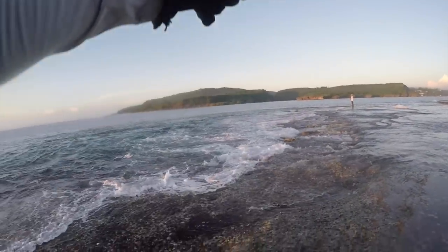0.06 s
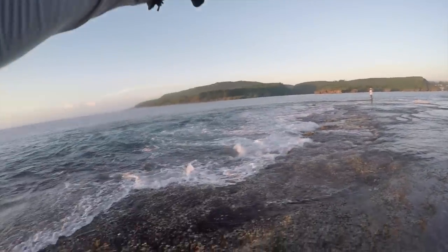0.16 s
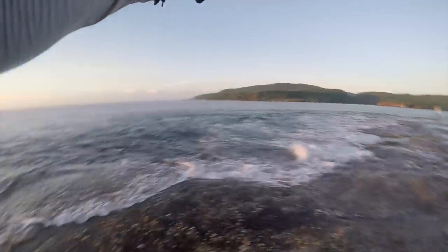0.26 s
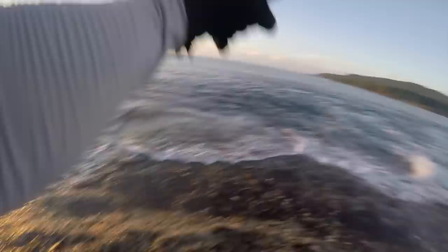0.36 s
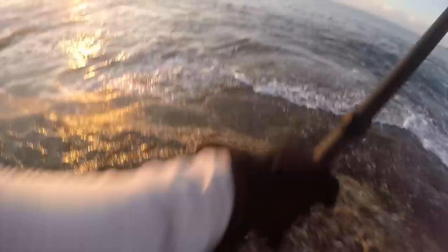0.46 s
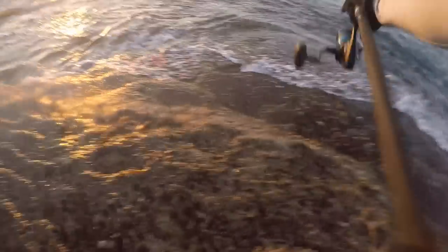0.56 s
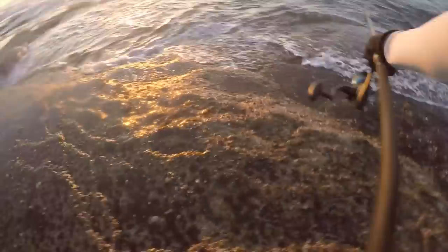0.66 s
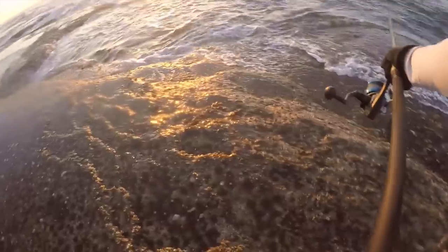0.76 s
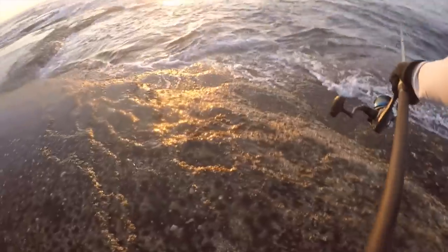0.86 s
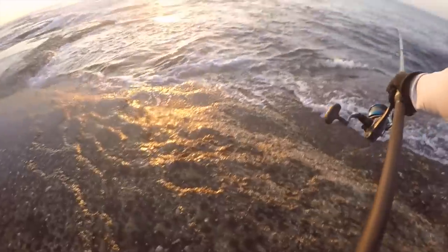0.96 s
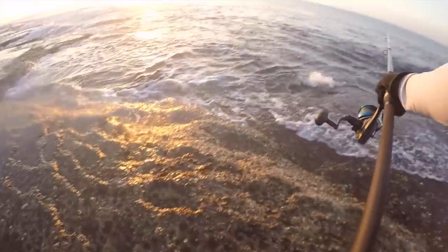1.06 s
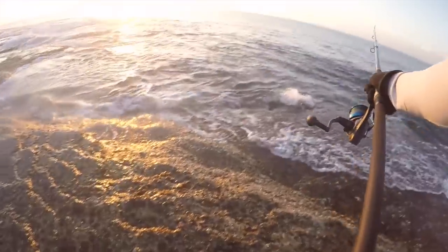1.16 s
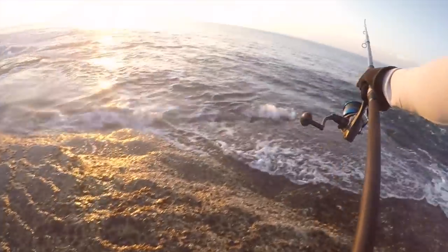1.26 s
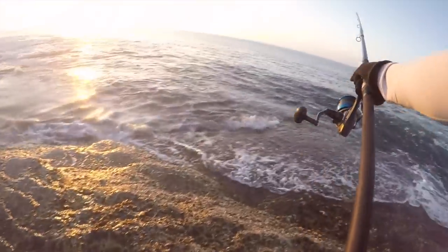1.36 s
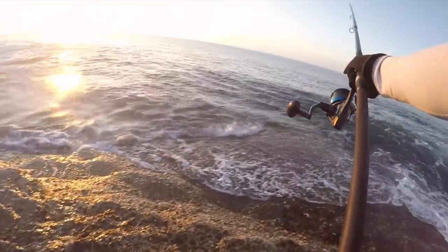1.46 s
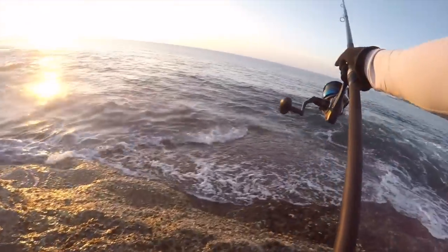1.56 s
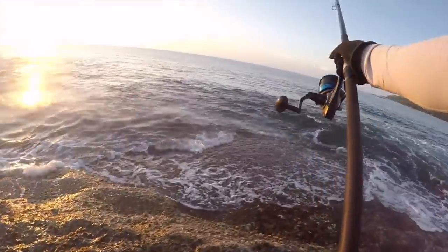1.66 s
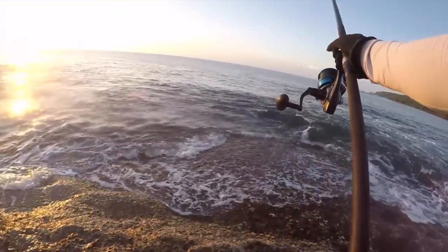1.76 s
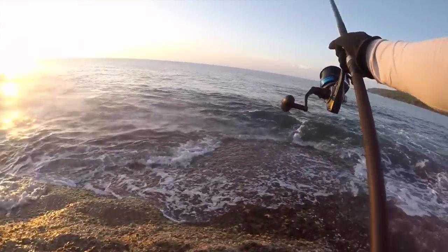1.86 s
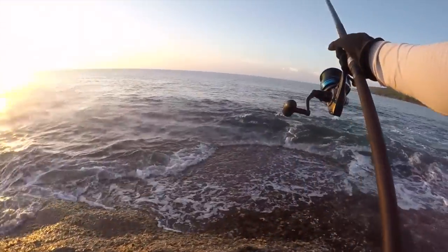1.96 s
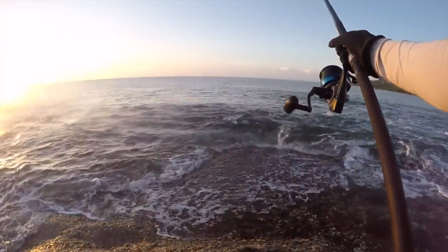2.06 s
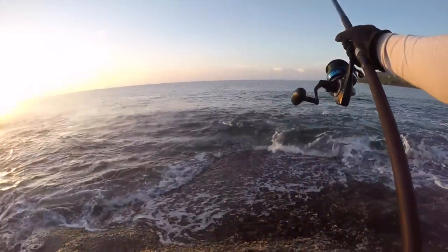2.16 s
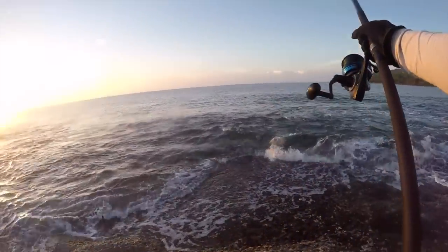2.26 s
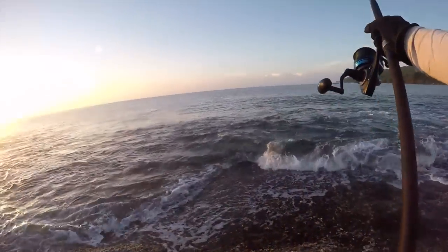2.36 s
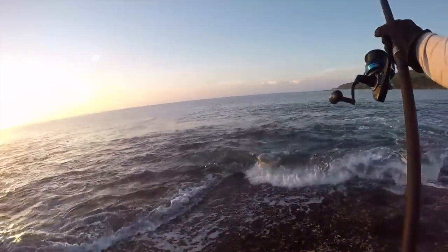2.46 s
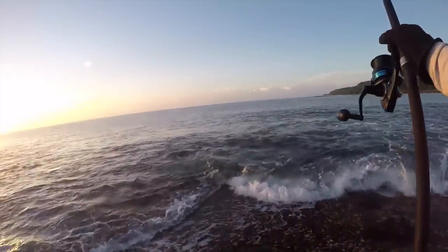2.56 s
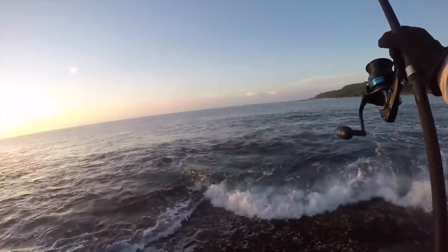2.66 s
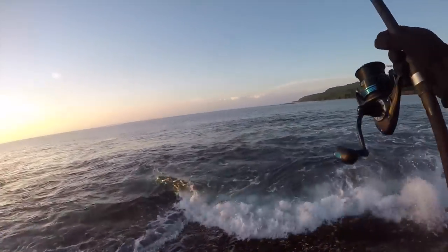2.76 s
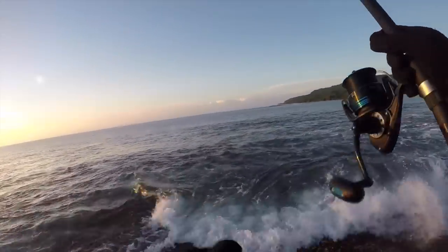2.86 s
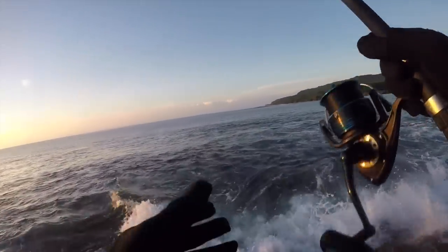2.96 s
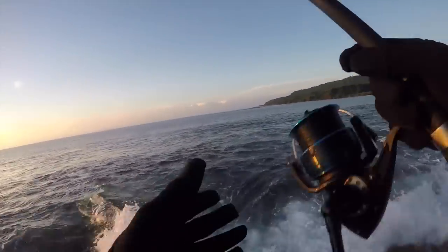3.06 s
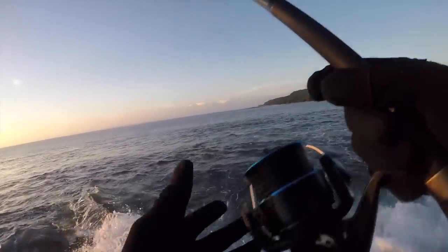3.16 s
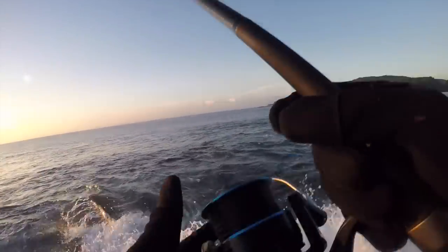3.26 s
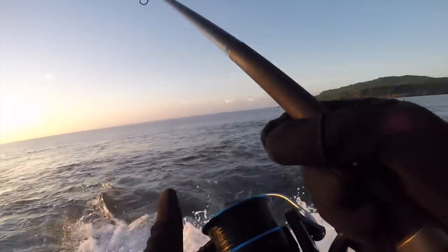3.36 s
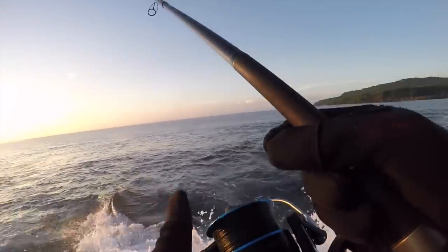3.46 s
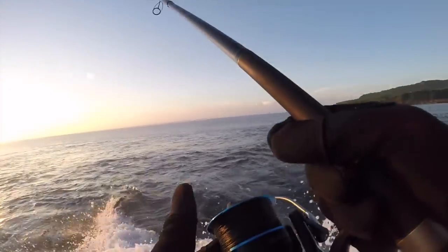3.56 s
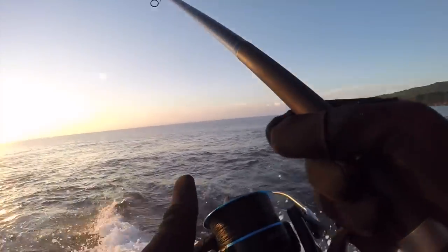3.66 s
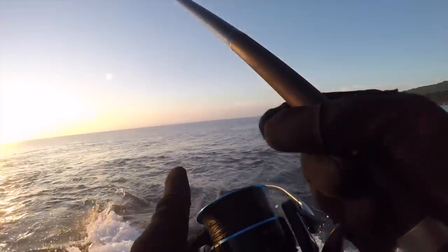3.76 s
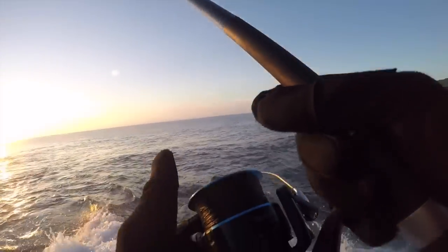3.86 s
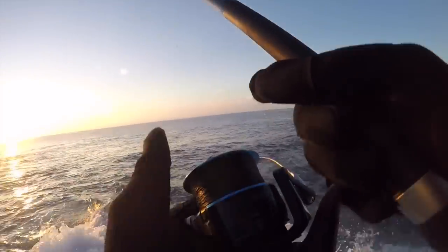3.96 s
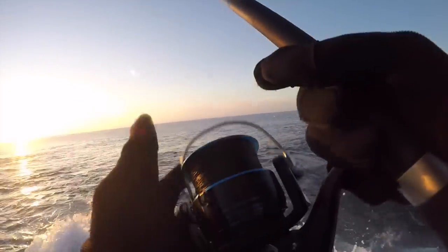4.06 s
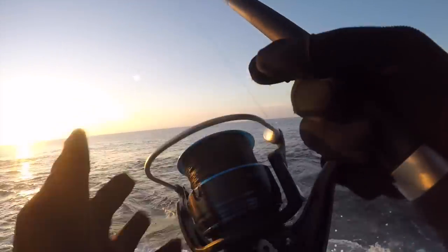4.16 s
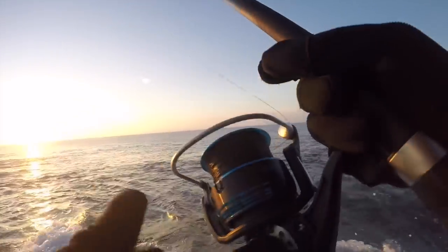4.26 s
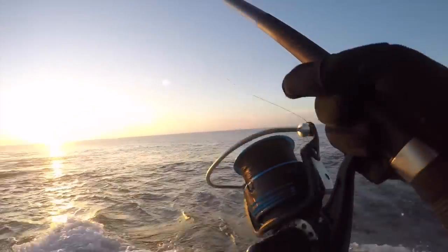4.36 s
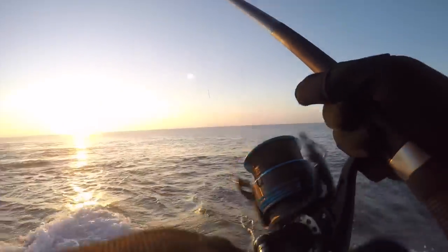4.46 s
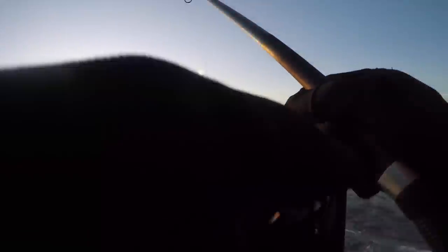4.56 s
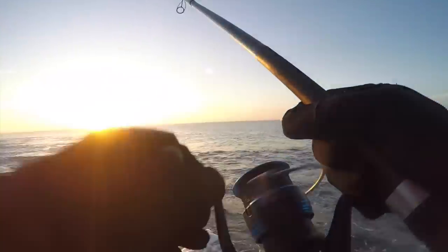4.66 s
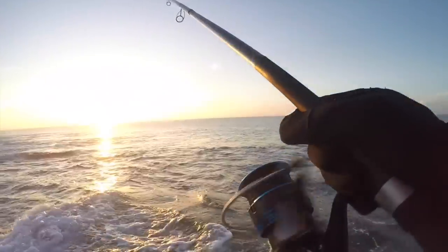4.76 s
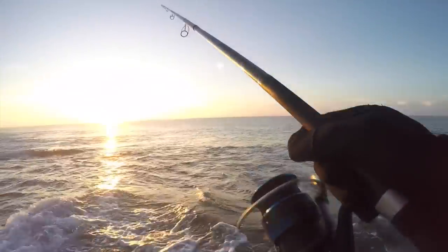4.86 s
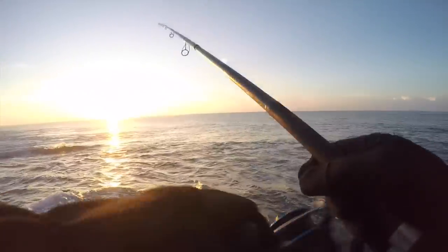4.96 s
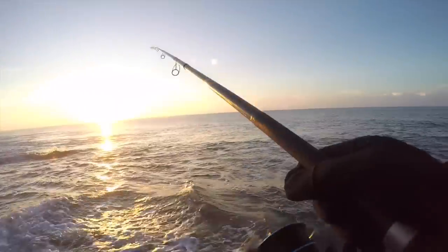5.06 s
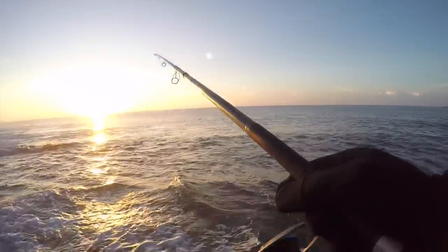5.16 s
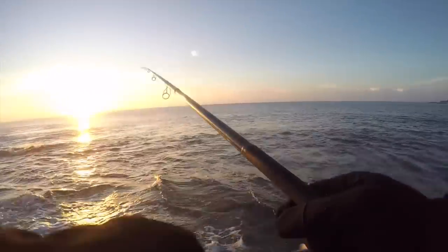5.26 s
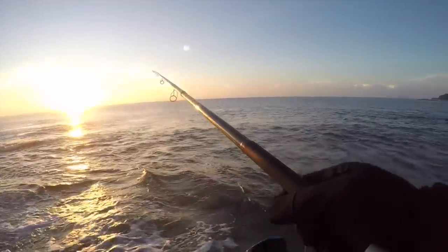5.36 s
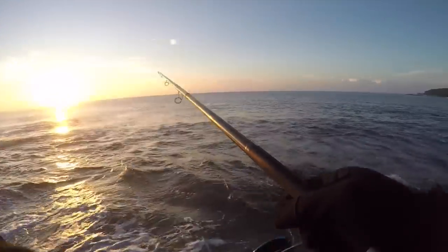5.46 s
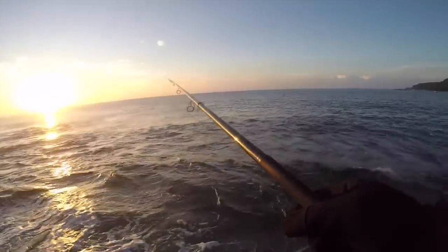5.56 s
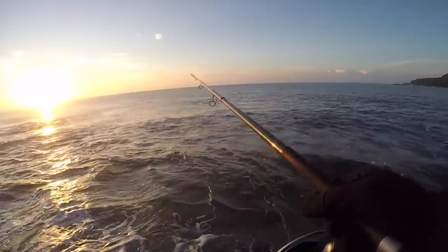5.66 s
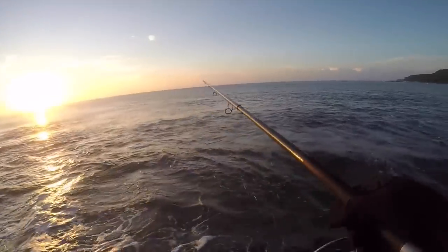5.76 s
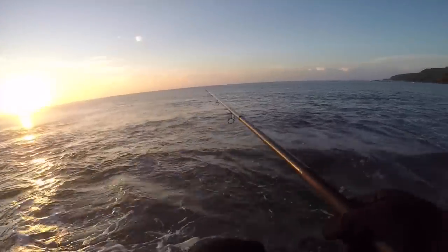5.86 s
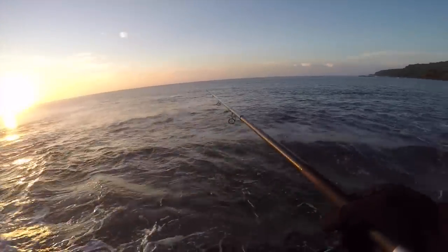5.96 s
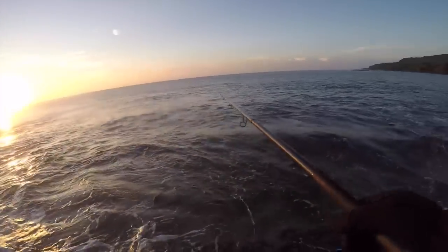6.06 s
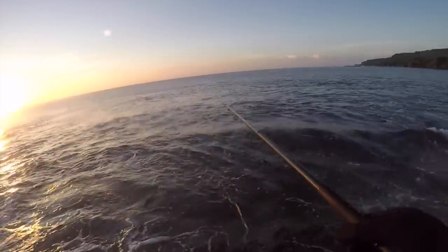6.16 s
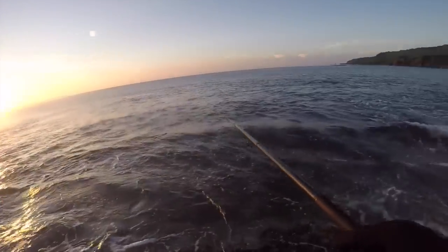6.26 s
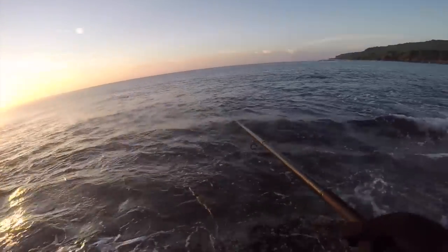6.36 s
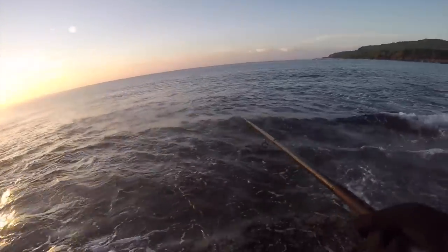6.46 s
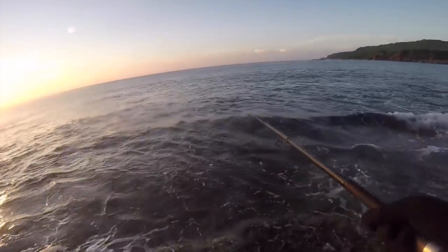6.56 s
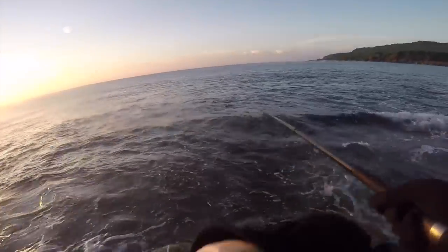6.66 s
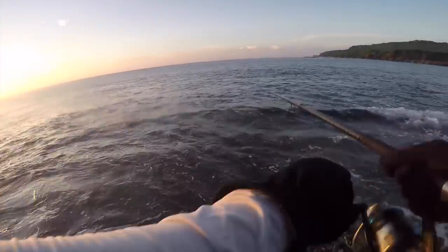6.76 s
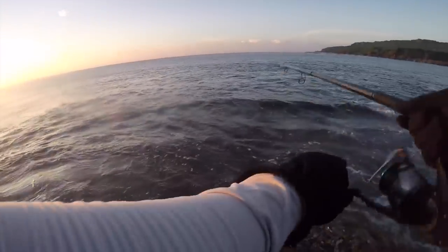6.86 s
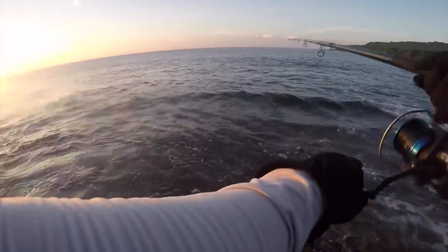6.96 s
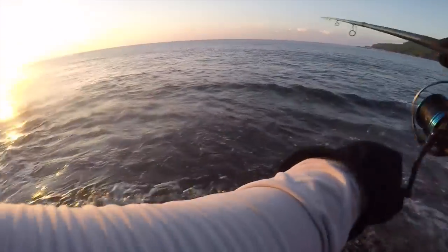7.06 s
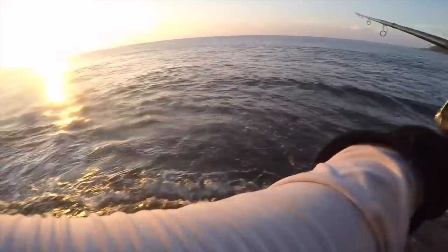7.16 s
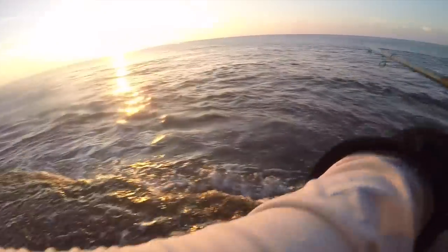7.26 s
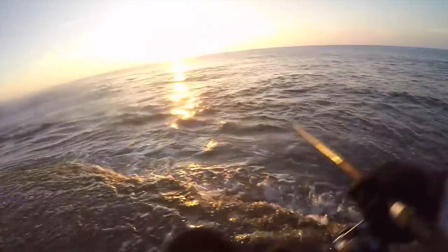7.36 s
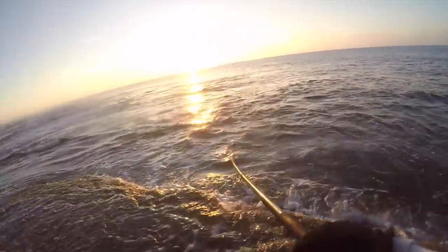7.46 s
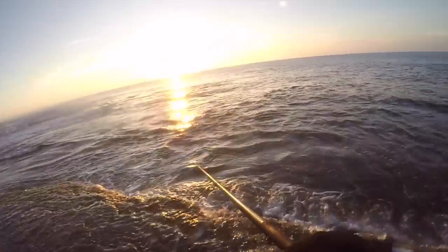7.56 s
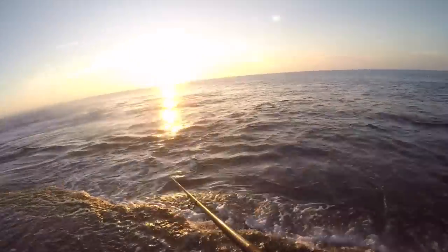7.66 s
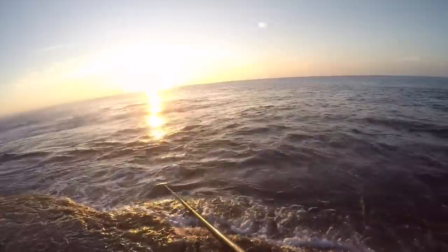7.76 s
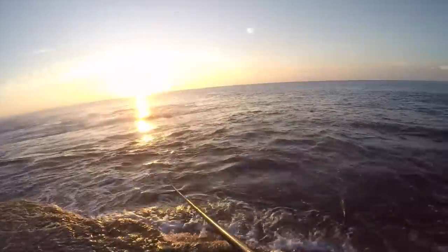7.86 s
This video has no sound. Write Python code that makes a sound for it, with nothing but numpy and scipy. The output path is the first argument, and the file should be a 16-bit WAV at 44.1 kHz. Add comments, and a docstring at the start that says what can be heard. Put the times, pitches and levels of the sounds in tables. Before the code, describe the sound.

Boxy, close body-mounted sound of sea fishing. Heavy plastic knocks and sleeve scrapes come early, with deep strap jolts. The surf rises into a hissing, fizzing break, then a reel bail snaps and rattles. Spray ticks lightly, the wash thins, one hollow knock sounds, and the water swells again near a last low thump. A soft heartbeat throbs underneath.

```python
"""Surf breaks on a rocky shore, heard through the sealed housing of a chest-mounted camera. The angler's
heartbeat and body movement thump through the strap as short swings and low rumble. Knocks ring struck modes,
mostly the housing's, while near 5.72 s the rod butt strikes its mount; a sleeve rubs the housing with grainy
noise during a cast; the reel's wire bail and the line click as rattle bursts that ring metal parts. Drops of
spray tick as puffs of noise over faint microphone hiss."""
import sys
import numpy as np
from scipy import signal
from scipy.fft import rfft, irfft
from scipy.io import wavfile
from scipy.ndimage import uniform_filter1d

SR = 44100
rng = np.random.default_rng(int(sys.argv[2]) if len(sys.argv) > 2 else 0)


def wav_out(sig):
    """Save sig, one row per channel (or a flat mono array), as 16-bit PCM at SR to the path in sys.argv[1]."""
    wavfile.write(sys.argv[1], SR, np.round(np.clip(np.atleast_2d(sig).T, -1, 1) * 32767).astype(np.int16))


def to_linear_factor(level_db):
    """Convert decibel levels (scalar or array-like) to linear amplitude factors."""
    exponent = np.asarray(level_db, float) / 20
    return 10 ** exponent


N = 348831

# Modes rung by knocks and rubs, mostly of the housing shell. Each row: frequency in Hz, relative level in dB,
# free t60 in seconds.
STRUCK_MODES = [(163.5, 22, 0.047), (246.5, 11, 0.06), (464, -1.5, .025), (621, 10, 0.047),
                (888, 11.5, 0.034), (977, -3, 0.09), (1123, -3, 0.067), (1600, -12, 0.014),
                (2215, 5.5, 0.034), (3686, 14.5, 0.013), (4730, 14, 0.0042), (6300, 8, 0.0068)]


def evened(x):
    """Scales to rms 1."""
    return x / np.sqrt(np.mean(x ** 2) + 1e-20)


def read(points, hz):
    """Interpolates a spectrum in dB on a log-frequency axis."""
    f, value = np.transpose(points)
    return np.interp(np.log(hz + 1), np.log(f + 1), value)


def bumps(table, hz):
    """Sum of resonance-shaped peaks and dips in dB; rows of Hz, width in Hz, dB."""
    return sum(db / (1 + (2 * (hz - f) / width) ** 2) for f, width, db in table)


def add(mix, s, sound):
    """Mixes a sound in at s seconds."""
    part = mix[max(round(s * SR), 0):][:len(sound)]
    part += sound[:len(part)]


def grid(size, count):
    """Frame times in s and bin frequencies in Hz for count samples."""
    return np.arange(count * 4 // size + 5) * size / 4 / SR, np.fft.rfftfreq(size, 1 / SR)[:, None]


def noise(field_db, size):
    """Noise from random short-time spectra under a bins x frames field of dB."""
    a, b = rng.standard_normal(field_db.T.shape + (2,)).T
    spectra = (a + 1j * b) * to_linear_factor(field_db)
    return signal.istft(spectra, nperseg=size, noverlap=size * 3 // 4)[1]


def drift(t, hz, bins, frames):
    """Random bins x frames field of rms 1, smoothed over frequency and time."""
    field = rng.standard_normal((len(t), len(hz))).T
    field = uniform_filter1d(field, size=bins, axis=0)
    return evened(uniform_filter1d(field, size=frames, axis=1))


def puff(colour, count):
    """Noise of rms 1 with the given gain per bin."""
    return evened(irfft(rfft(rng.standard_normal(count)) * colour))


def surf(patchy_db=1.1, splash_db=.7, surf_db=-50):
    """Wide noise in drifting patches and wideband splashes; low roar lags as foam, fizz shifts in surges."""
    # Each row: time in seconds, wash level in dB over its mean.
    wash_curve = [(0, 3.5), (.8, 1), (2.1, 2), (2.4, 5.5), (2.6, 10), (2.95, 12.5), (3.22, 12), (3.5, 6.5),
                  (3.65, 10), (3.85, 14), (4.05, 7.5), (4.25, 4), (4.4, 7), (4.55, 3), (5.35, 1),
                  (6.3, -4.5), (6.9, 2), (7.55, 6.5), (7.91, 3)]
    # Each row: frequency in Hz, relative density in dB per Hz.
    wash_spectrum = [(60, -19.5), (500, -19.5), (1000, -18), (2500, -5.5), (5000, -22.5), (9000, -37),
                     (15000, -45)]
    # Treble fizz over the wash. Each row: time in seconds, level in dB.
    fizz_curve = [(0, -5.5), (2.2, -0.5), (2.6, 4), (3.2, 4.5), (3.6, 7), (4.4, 5), (5.2, 4), (6.9, -12.5),
                  (7.91, 3)]
    # Bands of spray swell as the wave breaks. Each row: centre in seconds, centre in Hz, boost in dB.
    surges = [(2.62, 11500, 5), (3.08, 4900, 4), (3.05, 12800, 4)]
    surge_s, surge_hz = .17, 1100  # half length, half width
    roar_hz, fizz_hz = 935, 5630  # roar lies below, fizz above
    foam_s = 0.36  # foam builds up behind the wash and lingers
    roar_extra_db, roar_db_per_foam_db, roar_db_per_wash_db = -4, 0.97, -0.041
    far_roar_db = 3.5  # distant breakers hold the low roar above this, on the wash scale

    t, hz = grid(size=512, count=N)
    wash_db = np.interp(t, *np.transpose(wash_curve))
    linger = np.exp(-t[1] / foam_s)
    foam_start = [linger * to_linear_factor(wash_db[0]) ** 2]
    foam_power = signal.lfilter([1 - linger], [1, -linger], to_linear_factor(wash_db) ** 2, zi=foam_start)[0]
    foam_db = 10 * np.log10(foam_power)
    roar_db = roar_extra_db + roar_db_per_foam_db * foam_db + roar_db_per_wash_db * wash_db
    roar_db = 10 * np.log10(to_linear_factor(roar_db) ** 2 + to_linear_factor(far_roar_db - wash_db) ** 2)
    fizz_db = np.interp(t, *np.transpose(fizz_curve))

    patches = drift(t, hz, bins=8, frames=20)
    splashes = evened(uniform_filter1d(rng.standard_normal(len(t)), size=10))
    low = 1 / (1 + (hz / roar_hz) ** 2)
    high = 1 / (1 + (fizz_hz / (hz + 1)) ** 4)
    surges_db = sum(db * np.exp(-((t - s) / surge_s) ** 2 - ((hz - f) / surge_hz) ** 2)
                    for s, f, db in surges)
    field_db = read(wash_spectrum, hz) + wash_db + low * roar_db + high * fizz_db + surges_db
    field_db = field_db + patchy_db * patches + splash_db * splashes
    return to_linear_factor(surf_db) * noise(field_db, size=512)[:N]


def thump(hz, cycles, phase, glide=0.):
    """A brief swing of the chest strap, Gaussian around .1 s; glide bends its pace."""
    t = np.arange(-.1, .15, 1 / SR)
    turns = hz * t
    return np.exp(-(turns / (0.67 * cycles)) ** 2) * np.cos(2 * np.pi * (turns - glide * turns ** 2) + phase)


def movement(lumpy_db=3):
    """Lumpy low rumble of body movement through the strap."""
    # Each row: time in seconds, level in dB.
    sway = [(0, -42.5), (.35, -37.5), (.45, -23.5), (.74, -17.5), (.82, -42.5), (6.1, -38), (6.5, -43.5),
            (7.45, -36.5), (7.91, -42.5)]
    # Each row: frequency in Hz, relative density in dB per Hz.
    strap_spectrum = [(15, 9.5), (28, -5), (90, -11), (150, -21.5), (250, -31.5), (500, -73)]
    t, hz = grid(size=2048, count=N)
    lumps = evened(uniform_filter1d(rng.standard_normal(len(t)), size=3))
    rumble = evened(noise(read(strap_spectrum, hz) + lumpy_db * lumps, size=2048)[:N])
    return rumble * to_linear_factor(np.interp(np.arange(N) / SR, *np.transpose(sway)))


def heartbeats(second_s=.19, second_db=-12, second_hz=38, snap_s=0.0057, snap_hz=105, snap_db=-14):
    """Each beat swings the strap; the valves snap shut and a second heart sound follows."""
    # Each row: centre of the first sound in seconds, its peak in dB.
    beats = [(.082, -28.5), (0.925, -23), (1.349, -24), (1.774, -22), (2.194, -21.5), (2.611, -22.5),
             (3.022, -22.5), (3.438, -24.5), (3.851, -27), (4.267, -25), (4.68, -22), (5.094, -23.5),
             (5.508, -25), (5.926, -26), (6.323, -28), (6.724, -29.5), (7.127, -36), (7.536, -24.5)]
    beat_hz_at_ref, ref_db, hz_per_db = 54.2, -22, 2.5  # stronger beats swing faster
    start_cycles, cycles_lost_per_s = 2.01, 0.18  # beats grow shorter as time passes
    glide_per_cycle, steady_cycles = -0.35, 1.3  # longer beats speed up, shorter ones slow down
    out = np.zeros(N)
    for s, db in beats:
        beat_hz = beat_hz_at_ref + hz_per_db * (db - ref_db)
        cycles = start_cycles - cycles_lost_per_s * s
        glide = glide_per_cycle * (cycles - steady_cycles)
        add(out, s - .1, to_linear_factor(db) * thump(beat_hz, cycles, np.pi, glide))
        add(out, s + second_s - .1, to_linear_factor(db + second_db) * thump(second_hz, 1.2, np.pi))
        add(out, s + snap_s - .1, to_linear_factor(db + snap_db) * thump(snap_hz, 1.5, 0))
    return out


def jolts(jolt_cycles=0.85):
    """Jolts of the strap: each swings out, then back."""
    # Each row: centre in seconds, envelope peak in dB, frequency in Hz.
    jolt_rows = [(.38, -2.5, 40), (0.441, -11, 70), (.558, -3, 32.4), (.54, -9, 133), (0.662, -7, 58),
                 (0.724, -12.5, 13.6), (4.564, -25, 73), (4.614, -18, 21), (4.699, -25, 56),
                 (5.974, -30, 116), (7.12, -40, 62), (7.17, -30, 88), (7.384, -26.5, 62), (7.434, -7.5, 33),
                 (7.468, -14.5, 33)]
    out = np.zeros(N)
    for s, db, jolt_hz in jolt_rows:
        add(out, s - .1, to_linear_factor(db) * thump(jolt_hz, jolt_cycles, np.pi / 2))
    return out


def hum():
    """A short low sine sinks in pitch, faded at both ends."""
    # Each row: time in seconds, frequency in Hz, rms level in dB.
    hum_curve = [(1.07, 155, -51), (1.13, 129, -44.5), (1.24, 109, -56)]
    out = np.zeros(N)
    s, hum_hz, db = np.transpose(hum_curve)
    t = np.arange(s[0], s[-1], 1 / SR)
    tone = np.sin(2 * np.pi * np.cumsum(np.interp(t, s, hum_hz)) / SR)
    tone *= signal.windows.tukey(len(t), .3)
    add(out, s[0], np.sqrt(2) * to_linear_factor(np.interp(t, s, db)) * tone)
    return out


def body():
    """Movement, heartbeats, jolts and hum, all carried by the strap."""
    return movement() + heartbeats() + jolts() + hum()


def knocks(soft_samples=5, crack_db=-11, crack_t60_s=.014, lead_s=.0018, swell_cycles=0.15):
    """Each blow rings the struck modes nearest to what it favours; a short crack of first contact leads."""
    # Each row: start in seconds, level in dB, frequency the blow favours in Hz,
    # dB lost per squared octave away, share of the free ring time left by the grip.
    blows = [(.401, -4.5, 800, 2.3, .85), (.435, -22, 1000, 8, .6), (.540, -18, 250, 5, .7),
             (.6505, -8, 170, 5, .7), (.6733, -3, 800, 2.5, .65), (.684, -17, 620, 12, 1.1),
             (4.585, -19, 290, 6, .9), (4.587, -22, 2500, 10, .9), (4.596, -18, 2200, 10, .9),
             (5.7197, -10, 900, 1.5, .55), (5.7225, -22, 200, 6, .7), (6.065, -30, 200, 4, .9),
             (7.047, -22, 1650, 150, .9), (7.385, -19, 500, 3, .4)]
    out, t = np.zeros(N), np.arange(4096) / SR
    hz, mode_db, t60 = np.transpose(STRUCK_MODES)[:, :, None]
    bins_hz = np.fft.rfftfreq(len(t), 1 / SR) + 1
    touch = np.exp(-(np.arange(-24, 25) / soft_samples) ** 2 * 4)  # contact lasts a few samples
    swell = 1 - np.exp(-t * hz / swell_cycles)  # modes build up over part of a cycle, bass last
    for s, db, blow_hz, loss_db, free in blows:
        ring_db = mode_db - loss_db * np.log2(hz / blow_hz) ** 2 - 60 * t / (t60 * free)
        rings = (swell * to_linear_factor(ring_db) * np.sin(2 * np.pi * hz * t)).sum(0)
        rings = np.r_[np.zeros(round(lead_s * SR)), rings][:len(t)]
        crack = puff(to_linear_factor(-loss_db * np.log2(bins_hz / blow_hz) ** 2), len(t))
        crack *= to_linear_factor(crack_db - 60 * np.maximum(t - lead_s, 0) / crack_t60_s)
        blow = rings / abs(rings).max() + crack
        blow *= 1 - np.exp(-t * 9000 / np.sqrt(loss_db))  # a narrow blow swells over some cycles
        add(out, s, to_linear_factor(db) * np.convolve(blow, touch / touch.sum())[24:])
    return out


def rub(grain_db=3, scrape_db=3, ring_db=14, width_hz=350, fall_db_per_s=295):
    """Sleeve fibres catch and slip: grainy noise that rings the shell; each stroke swells, then fades."""
    # Each row: peak in seconds, level in dB, swell in dB per s, tilt above 3 kHz in dB per octave.
    stroke_rows = [(.37, -41.5, 300, -14), (0.512, -27.5, 140, 5), (0.594, -34.5, 400, 13),
                   (0.659, -32.5, 268, 9), (.72, -42, 150, 11)]
    # Each row: frequency in Hz, relative density in dB per Hz.
    cloth_spectrum = [(150, 17.5), (1200, 8.5), (3600, 1.5), (6000, -10), (9000, -31.5), (15000, -41)]
    out, start = np.zeros(N), stroke_rows[0][0] - .05
    s, db, rise, tilt_db = np.transpose(stroke_rows)[:, :, None]
    t, hz = grid(size=256, count=round((stroke_rows[-1][0] + .15 - start) * SR))
    strokes_db = db - np.maximum(rise * (s - start - t), fall_db_per_s * (t + start - s))
    tilt_now_db = tilt_db[strokes_db.argmax(0), 0]  # the loudest stroke sets the tilt
    reached = [(f, width_hz, ring_db) for f, _, _ in STRUCK_MODES if 2000 < f < 4000]
    field_db = read(cloth_spectrum, hz) + bumps(reached, hz)
    field_db = field_db + tilt_now_db * np.log2(np.maximum(hz / 3000, 1))
    scrapes = drift(t, hz, bins=12, frames=6)
    grains = rng.standard_normal(len(t))
    fibres = evened(noise(field_db + scrape_db * scrapes + grain_db * grains, size=256))
    add(out, start, fibres * to_linear_factor(np.interp(np.arange(len(fibres)) / SR, t, strokes_db.max(0))))
    return out


def clicks(thin_per_s=20, blur_s=.04):
    """Reel and line clicks: held, then dying rattles ring the reel; a long rattle blurs the rings."""
    # Each row: start in seconds, level in dB, tilt above 3 kHz in dB per octave,
    # hold in seconds, t60 in seconds.
    click_rows = [(1.196, -36, -13, 0.00091, .02), (4.176, -20.5, -11, 0.0035, 0.05),
                  (4.206, -32, -12.5, .001, 0.076), (4.553, -30.5, -9, 0.052, 0.027),
                  (4.584, -32, -8, 0.019, 0.031)]
    # Metal rings. Each row: frequency in Hz, width in Hz, peak before blurring in dB.
    reel_rings = [(2560, 410, 15.5), (3090, 100, 9), (4030, 140, 11), (5700, 210, 15), (7750, 140, 15),
                  (10000, 320, 9)]
    out, t = np.zeros(N), np.arange(4096) / SR
    hz = np.fft.rfftfreq(4096, 1 / SR)
    for s, db, tilt_db, held_s, t60_s in click_rows:
        rings_db = bumps(reel_rings, hz) / (1 + held_s / blur_s)
        colour = to_linear_factor(rings_db + tilt_db * np.log2(np.maximum(hz / 3000, 1)))
        # small parts give little bass unless the rattle lasts
        colour *= thin_per_s * held_s + 1 / (1 + (2300 / (hz + 1)) ** 6)
        onset = np.minimum(t / (0.00033 + 0.25 * held_s), 1)
        decay = to_linear_factor(db - 60 * np.maximum(t - held_s, 0) / t60_s)
        add(out, s, puff(colour, len(t)) * decay * onset)
    return out


def drops(t60_s=0.012, loss_db=4, trim_db=-1):
    """Drops of spray tick nearby: each a tiny decaying puff of noise around its pitch."""
    # Each row: start in seconds, level before the trim in dB, pitch in Hz.
    drop_rows = [(4.904, -42, 6880), (5.1063, -44, 6650), (5.182, -41, 7070), (5.258, -43, 4000)]
    out, t = np.zeros(N), np.arange(1024) / SR
    hz = np.fft.rfftfreq(len(t), 1 / SR) + 1
    for s, db, drop_hz in drop_rows:
        colour = to_linear_factor(-loss_db * np.log2(hz / drop_hz) ** 2)  # loss per squared octave
        add(out, s, puff(colour, len(t)) * to_linear_factor(db + trim_db - 60 * t / t60_s))
    return out


def housing(x):
    """Passage of airborne sound into the housing: minimum-phase filter of its peaks and dips."""
    # Each row: frequency in Hz, width in Hz, gain in dB.
    passage = [(1420, 117, -12), (1746, 290, 3), (2115, 423, -12), (2600, 240, 1), (2892, 325, -8),
               (3430, 470, 0.5), (3755, 135, -7.5), (4190, 170, 4), (4770, 94, 6.5), (4950, 690, -6.5),
               (5830, 290, -8.5), (6600, 370, 4.5), (8770, 530, -4.5)]
    hz = abs(np.fft.fftfreq(8192, 1 / SR))
    log_gain = np.log(to_linear_factor(bumps(passage, hz)))
    phase = -signal.hilbert(log_gain).imag
    taps = np.fft.ifft(np.exp(log_gain + 1j * phase)).real[:4096]
    return signal.oaconvolve(x, taps)[:N]


def microphone_hiss(hiss_db=-64):
    """Steady coloured noise of the microphone."""
    # Each row: frequency in Hz, relative density in dB per Hz.
    hiss_spectrum = [(100, -16), (5000, 8), (13900, 1), (14300, 11), (14700, 1), (15500, -3)]
    t, hz = grid(size=1024, count=N)
    return to_linear_factor(hiss_db) * evened(noise(read(hiss_spectrum, hz) + 0 * t, size=1024)[:N])


def scene():
    """Airborne sound passes the housing; the rest reaches the microphone through solid parts."""
    airborne = housing(surf() + clicks() + drops())
    solid = rub() + body() + knocks()
    return (airborne + solid)[None]


def top_cut(x):
    """Nothing passes above the cut-off."""
    return signal.sosfilt(signal.butter(12, 15700, fs=SR, output="sos"), x)


def record(dry):
    """Adds microphone hiss and limits the band."""
    edge_hz = 15330
    edge = signal.firwin(1023, edge_hz, window=("kaiser", 9), fs=SR)
    mix = signal.oaconvolve(dry + microphone_hiss(), edge[None], "same")
    return top_cut(mix)


dry = scene()
out = record(dry)
wav_out(out)
```